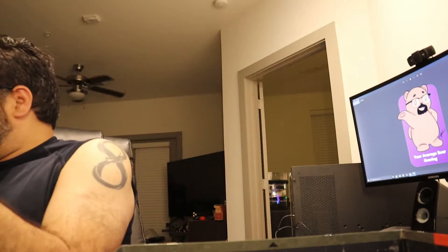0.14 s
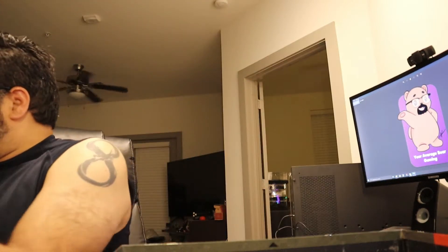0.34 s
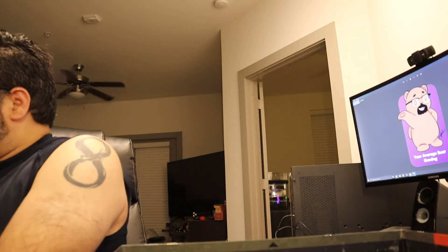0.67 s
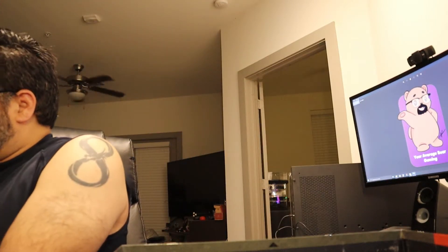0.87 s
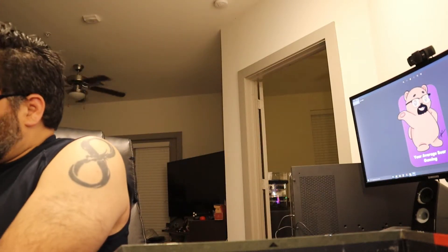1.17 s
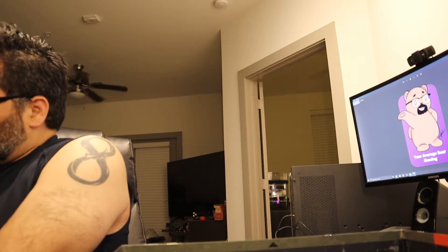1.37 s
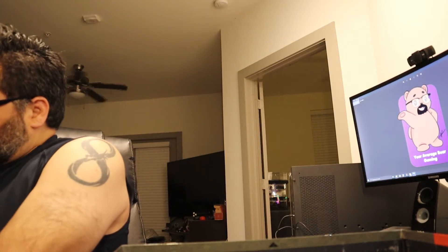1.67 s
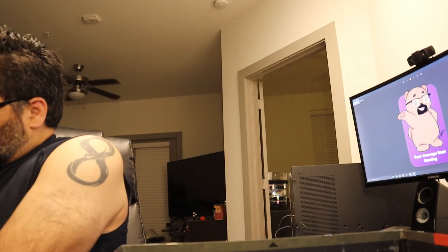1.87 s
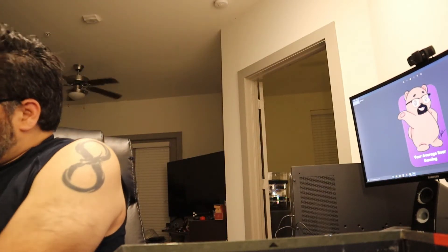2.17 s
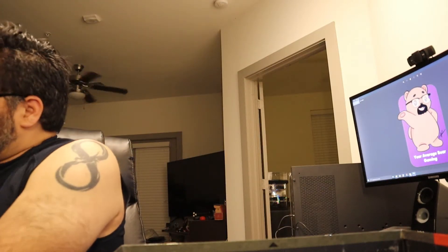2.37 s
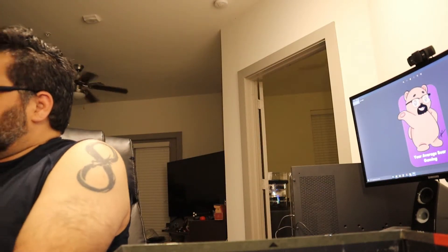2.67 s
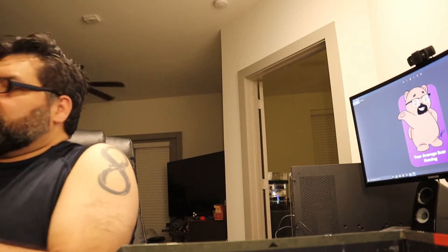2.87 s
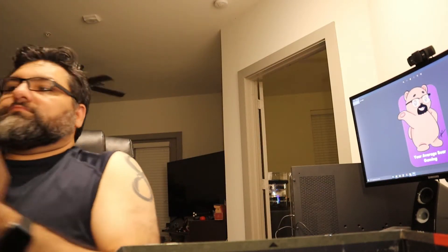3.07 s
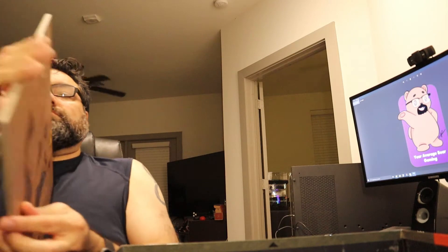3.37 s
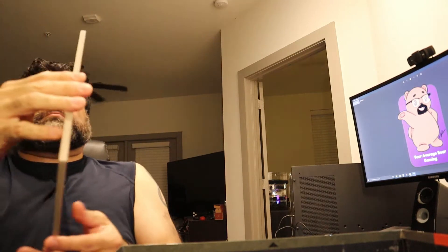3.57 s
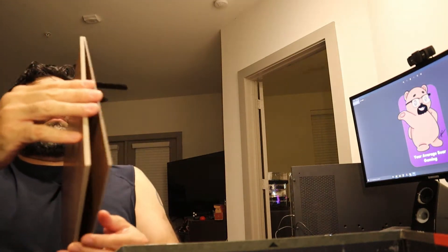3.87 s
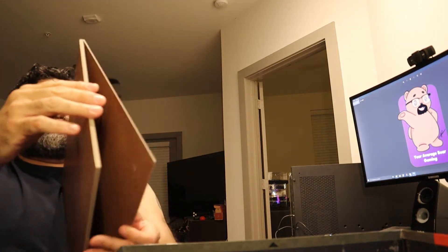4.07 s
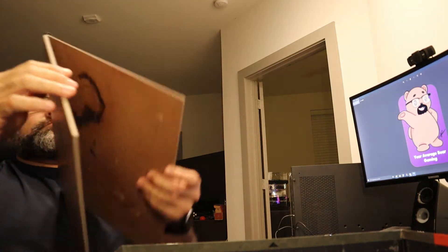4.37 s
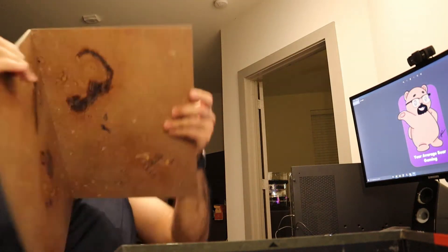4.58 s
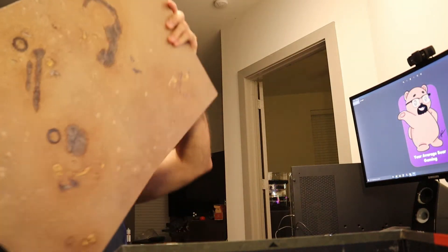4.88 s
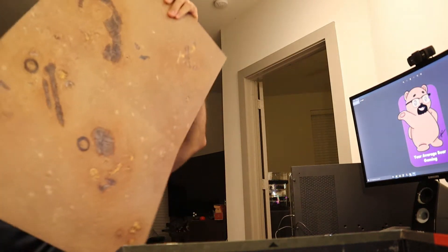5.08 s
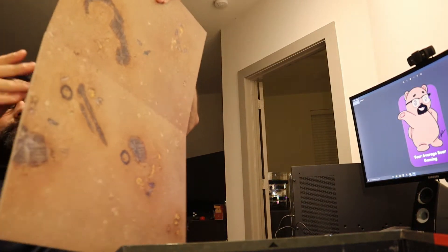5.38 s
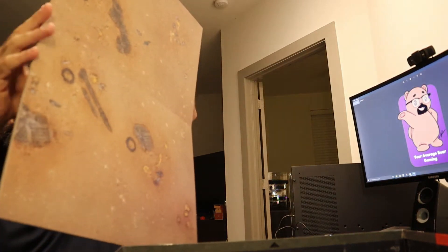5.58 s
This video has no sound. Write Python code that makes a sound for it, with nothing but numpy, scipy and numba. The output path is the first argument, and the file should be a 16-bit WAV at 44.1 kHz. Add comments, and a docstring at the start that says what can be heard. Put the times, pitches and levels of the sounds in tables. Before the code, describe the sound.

Loud brittle crackles of stiff wrapping, another sharp crack, quiet hand rubs on card, then a rapid clatter of heavy board knocks on the desk.

```python
"""Desk in a small room, close microphone: a thick folded card board is pulled from crinkly wrapping,
handled and unfolded. Creases crack or tick as noise bursts that knock the card panel; the wrapping rustles
as dense stick-slip grains; brushing, squeaks and one low woody rumble are swelling band noise; the board
bumps the desk, ringing its modes. Computer fans rumble as coloured noise with a low hum. The loudest
cracks clip."""
import sys
import numpy as np
from scipy import signal
from scipy.fft import rfft, irfft
from scipy.io import wavfile
from scipy.ndimage import uniform_filter1d
from numba import njit

SR = 44100
rng = np.random.default_rng(int(sys.argv[2]) if len(sys.argv) > 2 else 0)


def output_pcm(signal):
    """Save a mono or channel-first signal as 16-bit PCM at the path in sys.argv[1].

    Samples are clipped to [-1, 1] before scaling.
    """
    pcm = np.clip(np.atleast_2d(signal).T, -1, 1) * 32767
    wavfile.write(sys.argv[1], SR, np.round(pcm).astype(np.int16))


N = 253134  # samples


def undb(db):
    """Amplitude gain from dB."""
    return 10 ** (np.asarray(db) / 20)


def unit(x):
    """Scale to rms 1."""
    return x / np.sqrt(np.mean(x ** 2))


@njit
def state_variable_filter(x, hz, width_hz):
    """Band-pass of two integrators with moving centre, gain 1 at the centre."""
    y, band_state, low_state = np.empty(len(x)), 0., 0.
    for i in range(len(x)):
        g = np.tan(np.pi * hz[i] / SR)
        damping = width_hz[i] / hz[i]
        v = (band_state + g * (x[i] - low_state)) / (1 + g * (g + damping))
        band_state = 2 * v - band_state
        low_state = low_state + 2 * g * v
        y[i] = damping * v
    return y


def band(x, hz, width_hz):
    """Band-pass with fixed or moving centre and width."""
    centre_hz = np.clip(hz + np.zeros(len(x)), 20., .45 * SR)
    return state_variable_filter(x, centre_hz, width_hz + np.zeros(len(x)))


def walk(rate_hz):
    """Random levels held 1 / rate_hz seconds and slewed twice."""
    hold = int(SR / rate_hz)
    steps = np.repeat(rng.standard_normal(N // hold + 1), hold)
    return uniform_filter1d(uniform_filter1d(steps, hold), hold)[:N]


def add(out, start_s, sound):
    """Mix a sound in at start_s."""
    i = int(start_s * SR)
    out[i:i + len(sound)] += sound[:N - i]


def shape(x, points):
    """Colour a sound by (Hz, dB) points, joined over log frequency."""
    points_hz, points_db = np.transpose(points)
    hz = np.arange(1, N // 2 + 2) * SR / N
    return irfft(rfft(x) * undb(np.interp(np.log(hz), np.log(points_hz), points_db)), N)


def fan_hum():
    """One low fan tone of wavering level."""
    hum_hz, hum_db = 27.985, -52.5
    return undb(hum_db + 2.895 * walk(2.2)) * np.sin(2 * np.pi * hum_hz * np.arange(N) / SR)


# Fan air noise spectrum: f/Hz, relative level/dB per Hz
FAN_SPECTRUM = [(19, -44), (32, -5.5), (91, -9), (124, 3.5), (156, -7), (219, -0.5), (409, -14.5),
                (653, -24), (1070, -28), (1430, -30), (1750, -30.5), (2220, -33.5), (4970, -36),
                (5650, -34), (16000, -29)]


def fans():
    """Air noise whose rumble bands flicker a little, each on its own."""
    air = unit(shape(rng.standard_normal(N), FAN_SPECTRUM))
    out = air
    for hz in (60., 120., 215., 320.):
        flicker = undb(1.8 * walk(6.)) - 1
        out = out + flicker * band(air, hz, .5 * hz)
    return undb(-40.5) * out


def room(x):
    """The walls add a short diffuse tail of decaying noise."""
    t60_s, tail_db = 0.26164, -6
    t = np.arange(int(.5 * SR)) / SR
    tail = band(rng.standard_normal(len(t)), 5333, 11993.0)
    tail = tail * undb(-60 * t / t60_s) * np.minimum(t / 0.006, 1)
    tail = tail / np.sqrt(np.sum(tail ** 2))
    return x + undb(tail_db) * signal.fftconvolve(x, tail)[:N]


# Card panel resonances: f/Hz, width/Hz, level/dB
PANEL_MODES = [(480.18, 231.65, 9), (774, 490, 2), (1296, 670, 1), (2022.5, 888, -4.5), (3007, 3700, 0)]


def panel(x):
    """The stiff card panel answers with a few broad resonances."""
    return sum(undb(db) * band(x, hz, width_hz) for hz, width_hz, db in PANEL_MODES)


# Board against hand or desk: t/s, level/dB, contact/ms, edge tick relative level/dB
BUMPS = [(1.976, -13, 3.229, -40), (5.039, -29, 1.1, -32), (5.065, -25.5, 1.141, -28),
         (5.161, -26.5, 0.99, -28), (5.353, -29.5, 0.98, -30), (5.377, -21.5, 1.1385, -12),
         (5.5683, -6.5, 0.52, -23), (5.571, -12, 0.75, -6.5), (5.578, 2, 1.54, -28.5),
         (5.6093, -2, 0.58, -27), (5.62, 0, 0.705, -16.5), (5.637, -3, 0.8, -15.5), (5.658, -3, 1.35, -34),
         (5.682, -11, 0.77, -28), (5.701, 7.5, 8.025, -38), (5.722, 2.5, 8.443, -39.5)]
# Desk modes before the scatter of each blow: f/Hz, level/dB, t60/s
DESK_MODES = [(55.71, -10, 0.09675), (90, -6, 0.13), (119, 2.5, 0.044), (186.5, 1, 0.11),
              (216.09, 2, 0.08967), (311.17, 1, 0.097), (343, 1, 0.08458), (517, -2.5, 0.04785),
              (695, -11, 0.074), (893, -1.5, 0.04167), (1154, -15, 0.09966), (1446, -6.5, 0.0441),
              (2090, 0, .03)]


def desk_ring(t):
    """Decaying sines of alternating sign; every blow lands on another spot, shifting level and pitch."""
    ring = np.zeros(len(t))
    for k, (hz, db, t60_s) in enumerate(DESK_MODES):
        level_shift, pitch_shift = rng.standard_normal(2)
        envelope = undb(db + 2.0 * level_shift - 60 * t / t60_s)
        ring += (-1) ** k * envelope * np.sin(2 * np.pi * hz * (1 + 0.042 * pitch_shift) * t)
    return ring


def bumps():
    """A soft push rings the desk, a longer contact only its low modes; the edge ticks, the panel rattles."""
    out, t = np.zeros(N), np.arange(12000) / SR
    for start_s, db, contact_ms, tick_db in BUMPS:
        push = np.hanning(int(max(contact_ms, .2) * SR / 1000) + 3)
        thud = np.convolve(desk_ring(t), push / push.sum())[:len(t)]
        tick = band(rng.standard_normal(len(t)) * undb(-60 * t / 0.022), 2000., 4000.0)
        rattle = band(panel(rng.standard_normal(len(t))), 890.0, 1440.0)
        rattle = rattle * undb(-60 * t / 0.11) / contact_ms ** 0.84  # weaker for soft contacts
        blow = undb(-23) * rattle + undb(-8.0) * thud + undb(tick_db) * tick
        add(out, start_s, undb(db) * blow)
    return out


# Brushing strokes over the card; the first row is a low woody rumble of the board:
# middle t/s, level/dB, f/Hz, length at half height/s
BROAD_STROKES = [(0.147, -22, 513, 0.064), (0.704, -27, 8350, 0.085), (0.8, -30.5, 8800, 0.091),
                 (1.435, -25.5, 9720, 0.06165), (1.777, -30, 7672, 0.064), (2.897, -38, 6800, 0.05992),
                 (3.016, -33, 7160, 0.047), (3.574, -37, 5900, 0.076), (3.994, -44.5, 5890, 0.026),
                 (4.17, -24, 4900, 0.039), (4.645, -37.5, 9616, 0.058), (4.931, -37, 8900, 0.054),
                 (5.175, -39, 8230, 0.04231), (5.623, -41, 3500, .07), (5.725, -47, 4500, .04)]
# Narrow, whistling rubs: same columns
SQUEAKS = [(3.15, -52.5, 2041, 0.33), (3.53, -41.5, 4200, .012), (4.6, -44.5, 4450, 0.022),
           (4.931, -42, 4993, .07), (5.174, -48, 4848, 0.1), (5.685, -36, 4240, 0.017)]


def strokes_and_rumble():
    """Brushing, squeaks and the woody rumble swell and fade as band noise, little far below the centre."""
    out = np.zeros(N)
    for strokes, relative_width in ((BROAD_STROKES, 0.97), (SQUEAKS, 0.0956)):
        for middle_s, db, hz, length_s in strokes:
            width_hz = relative_width * hz
            swell = np.hanning(int(2 * length_s * SR))
            noise = band(rng.standard_normal(len(swell)), hz, width_hz)
            noise = band(noise, hz, 4.286 * width_hz)
            noise = signal.sosfilt(signal.butter(2, 0.38 * hz, "high", fs=SR, output="sos"), noise)
            add(out, middle_s - length_s, undb(db) * swell * unit(noise))
    return out


# Steady hand work: t/s, rustle level/dB, card panel relative level/dB
HANDS = [(0, -27, -16), (.05, -29.5, -20.5), (.5, -33, -13), (.86, -36, -6), (1.13, -37.5, -12),
         (1.28, -31, -10.5), (1.4, -40, -10), (1.56, -29.5, -16.5), (1.7, -36.5, -12.5),
         (1.95, -36.5, -7.5), (2.23, -33.5, -16), (2.35, -27, -11), (2.46, -35, -7.5), (2.51, -40, -14),
         (2.82, -51.5, -9), (3.07, -35.5, -12), (3.25, -39, -10), (3.35, -51.5, -13), (3.5, -41.5, -9.5),
         (3.7, -52, -14), (3.92, -54, -10), (4.1, -37, -8.5), (4.21, -31.5, 1), (4.25, -28, -5.5),
         (4.46, -32.5, -3), (4.5, -40, -3.5), (4.56, -44.5, -5), (4.66, -37, -4), (4.8, -49.5, -16),
         (5.55, -54.5, -3)]
# Hard tugs at the wrapping: t/s, rustle level/dB, settling/dB per s, card panel relative level/dB
TUGS = [(.1, -12.5, 57, -13), (.88, -22.5, 92, -12.5), (1.989, -13.5, 83.5, -13.5)]
TUG_RISE_S = 0.025


def handling(t):
    """Gains of film and card: steady hand work plus each tug and its settling, added as powers."""
    hands_s, hands_db, hands_panel_db = np.transpose(HANDS)
    film_power = undb(np.interp(t, hands_s, hands_db)) ** 2
    card_power = film_power * undb(np.interp(t, hands_s, hands_panel_db)) ** 2
    for start_s, db, settle_db_per_s, panel_db in TUGS:
        age_s = t - start_s
        tug = undb(db - settle_db_per_s * age_s) ** 2 * np.clip(age_s / TUG_RISE_S, 0, 1)
        film_power = film_power + tug
        card_power = card_power + tug * undb(panel_db) ** 2
    return np.sqrt(film_power), np.sqrt(card_power)


FILM_HZ, SKIN_HZ = 7520, 6590  # rustle centre before drift
FILM_UNTIL_S = 2.5
FILM_SPREAD_DB, SKIN_SPREAD_DB = 2.8, 2.2  # unevenness of grains: film crackles, skin on card hisses
GRAINS_PER_S = 3000.


def rustle():
    """Dense stick-slip grains of uneven size in a bright resonance; the panel sounds along."""
    t = np.arange(N) / SR
    film_gain, card_gain = handling(t)
    hz = np.where(t < FILM_UNTIL_S, FILM_HZ, SKIN_HZ) * (1 + .07 * walk(12.))
    spread_db = np.where(t < FILM_UNTIL_S, FILM_SPREAD_DB, SKIN_SPREAD_DB)
    sizes = undb(spread_db * np.minimum(rng.exponential(size=N), 4.5))
    slips = (rng.random(N) < GRAINS_PER_S / SR) * sizes
    smear = np.exp(-np.arange(300) / (0.001717 * SR))  # decay of slip power
    grain_level = np.sqrt(np.convolve(slips ** 2, smear)[:N])
    film, card = grain_level * rng.standard_normal((2, N))

    bright = band(band(film, hz, 1.02 * hz), hz, 1.53 * hz)
    bright = bright + undb(-21 + 1.9 * walk(25.197)) * band(film, 10000.0, 10500.0)
    mottle = undb(1.6 * walk(30.)) - 1  # of the lower edge
    bright = bright + mottle * band(bright, 4300., 2750.0)
    boxy = unit(band(panel(card), 1510.0, 3693.0))
    patchy = undb(1.6 * walk(40.))
    return patchy * (film_gain * unit(bright) + card_gain * undb(2.2 * walk(15.)) * boxy)


def small_cracks():
    """Lesser creases give way at random moments in the film, as loud as the film is busy."""
    count, max_over_rustle_db, knock_db = 50, 10.5, -24.5
    when, colour, size = rng.random((count, 3)).T
    start_s = when * FILM_UNTIL_S
    db = 20 * np.log10(handling(start_s)[0]) + max_over_rustle_db - 18.0 * size
    hz = FILM_HZ * (1 + 0.502 * colour)
    return [(s, level, f, knock_db) for s, level, f in zip(start_s, db, hz)]


# Creases snapping at set moments, from loud cracks to faint ticks:
# t/s, snap peak level/dB, f/Hz, panel knock relative level/dB
CRACKS = [(0.0571, -1, 7800, -16), (0.0786, 7.5, 8100, -10.5), (0.0885, 0, 9000, -19.5),
          (0.0934, 8.5, 7650, -10.5), (0.1014, 3.5, 7710, -21.5), (0.11, 2.5, 8000, -20),
          (0.1208, 3, 7924, -20), (0.1498, 5, 8350, -23), (0.177, 9.5, 8056, -34), (0.1857, -8, 8000, -29),
          (0.191, -7, 8000, -30), (0.2561, -4, 7600, -18.5), (0.312, -4.5, 7314, -25),
          (0.3732, -6, 7280, -18), (0.423, -10.5, 7404, -24), (0.4502, -12, 9300, -25),
          (0.469, -11.5, 9743, -34), (0.519, -6.5, 10910, -31.5), (0.5238, -15, 9160, -32),
          (0.5474, -19, 7800, -29), (0.532, -8.5, 9347, -37), (0.6686, -13, 7550, -28),
          (0.695, -7.5, 8013, -18), (0.8657, 6, 8690, -15), (0.874, -1, 6000, -30.5),
          (0.9033, 1.5, 11800, -14.5), (0.9108, 2, 8500, -19), (0.9514, -5, 6320, -17),
          (1.213, -25.5, 8800, -29), (1.2219, -10, 9034, -24), (1.2511, -17, 11000, -27),
          (1.276, -10.5, 7824, -16), (1.5836, -2.5, 9518, -45.5), (1.9618, -3, 5322, -21),
          (1.9748, 10.5, 6853, -10.5), (1.9966, 4, 7814, -10.5), (2.0071, 5.5, 7350, -8.5),
          (2.438, -13.5, 7218, -34), (4.6287, -18, 9300, -26), (4.8879, -12.5, 10160, -25),
          (4.942, -21, 7264, -36)]
CRACK_T60_AT_0_DB_S = 0.021953


def cracks():
    """Each crease snaps as a noise burst in its own colour and knocks the panel; big snaps last longer."""
    out, t = np.zeros(N), np.arange(3000) / SR
    for start_s, db, hz, knock_db in [*CRACKS, *small_cracks()]:
        t60_s = CRACK_T60_AT_0_DB_S * undb(0.4764 * db)
        decay = undb(-60 * t / t60_s) + 1.3 * undb(-60 * t / 0.0039)
        burst = rng.standard_normal(len(t)) * decay * np.minimum(t / 0.00013, 1)
        snap = band(band(burst, hz, 0.9295 * hz), hz, 1.48 * hz)
        snap = snap + undb(-17.0) * band(burst, 14400.0, 6667.0)
        knock = band(panel(burst), 1600.0, 1840.0)  # too short a blow for the lowest panel modes
        snap = snap / np.abs(snap).max()
        knock = knock / np.abs(knock).max()
        add(out, start_s, undb(db) * (snap + undb(knock_db) * knock))
    return out


def scene():
    """Fans and hum, bumps, strokes and rustle direct; cracks with the tail of the room."""
    background = fan_hum() + fans()
    return (background + bumps() + strokes_and_rumble() + rustle() + room(cracks()))[None]


# Microphone response: f/Hz, level/dB
MIC_RESPONSE = [(2200, 0.5), (3000, 0.5), (3800, 1.5), (4800, 1.5), (5800, -2), (7700, 0.5), (10000, 0.5),
                (13000, 1.5), (16000, -3)]
TOP_HZ = 15750


def record(dry):
    """The microphone colours the treble, the input clips at full scale and the top is cut."""
    clipped = np.clip(shape(dry[0], MIC_RESPONSE), -1, 1)[None]
    top_cut = signal.ellip(10, .2, 70, TOP_HZ, fs=SR, output="sos")
    return signal.sosfilt(top_cut, clipped)


dry = scene()
out = record(dry)
output_pcm(out)
```